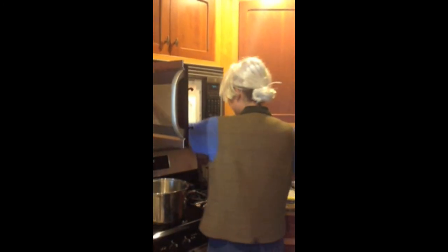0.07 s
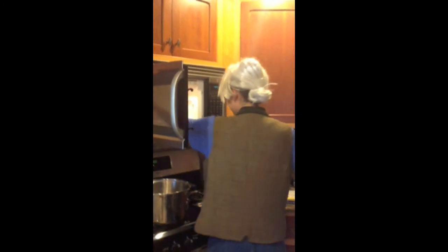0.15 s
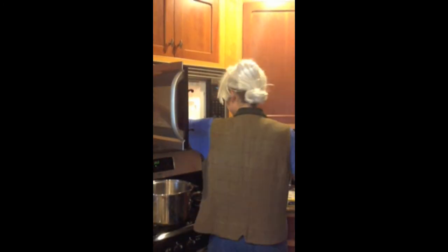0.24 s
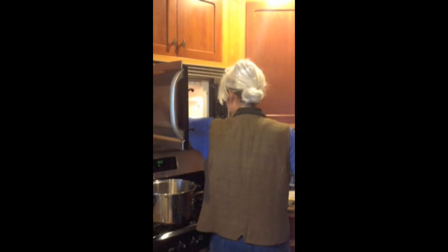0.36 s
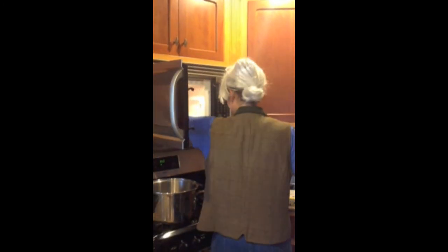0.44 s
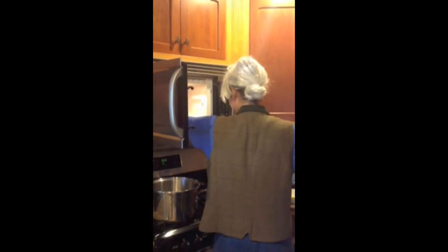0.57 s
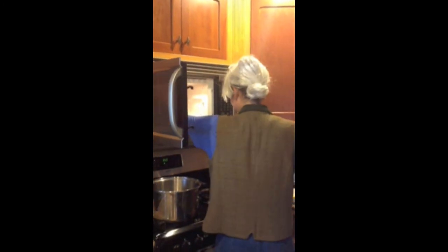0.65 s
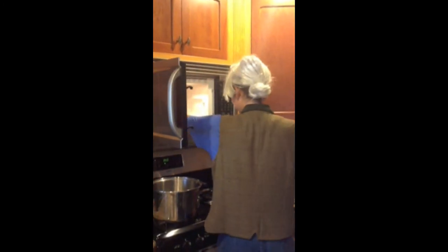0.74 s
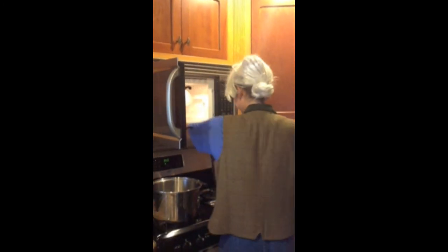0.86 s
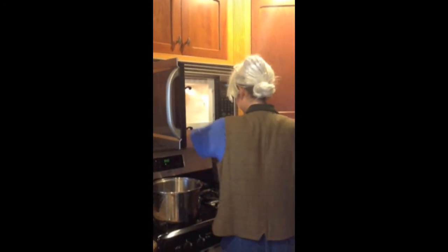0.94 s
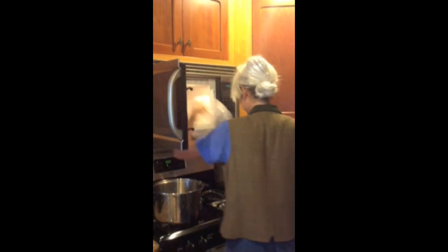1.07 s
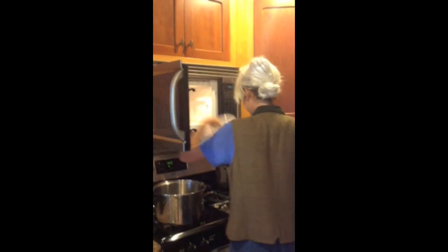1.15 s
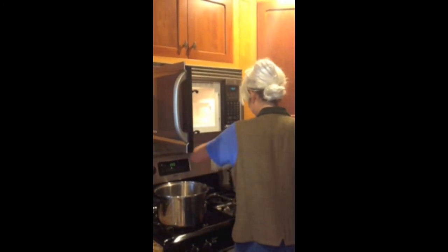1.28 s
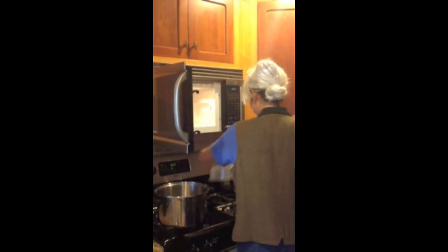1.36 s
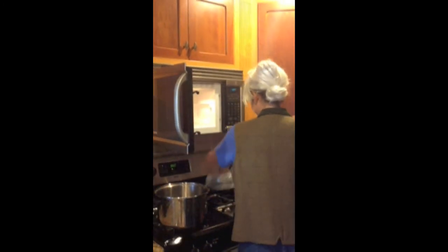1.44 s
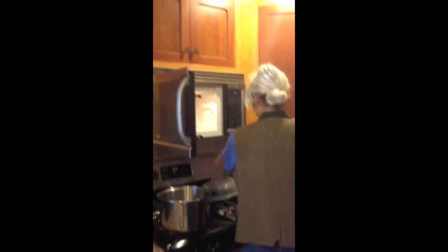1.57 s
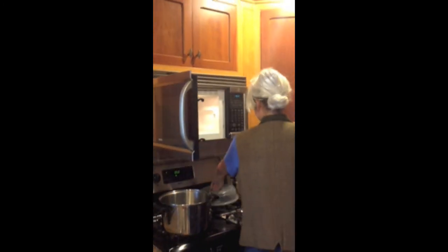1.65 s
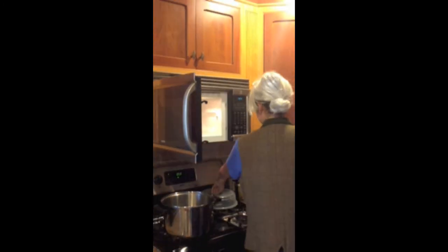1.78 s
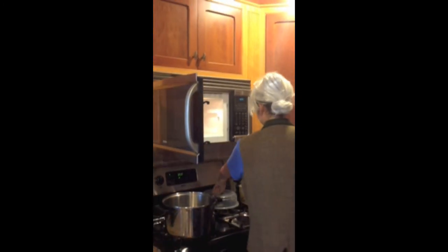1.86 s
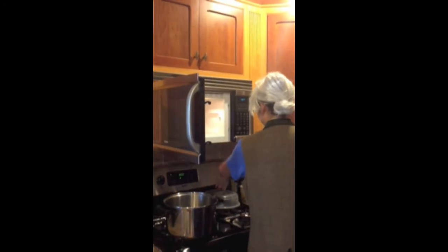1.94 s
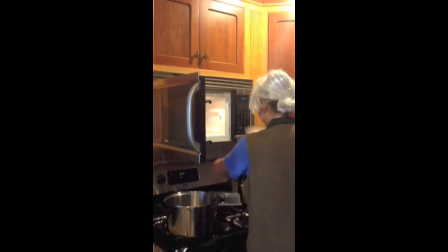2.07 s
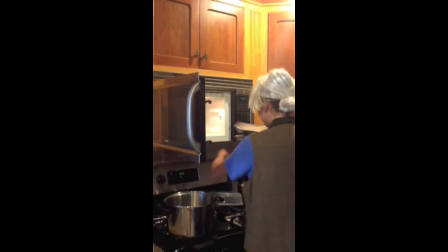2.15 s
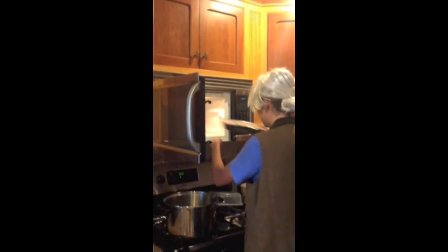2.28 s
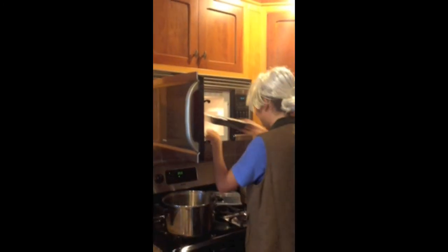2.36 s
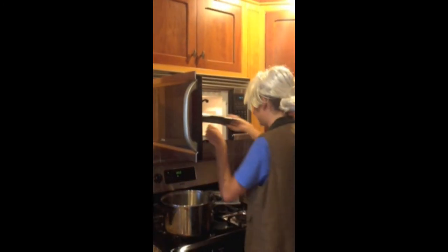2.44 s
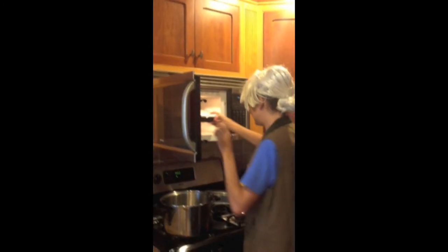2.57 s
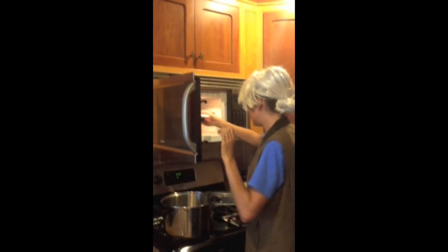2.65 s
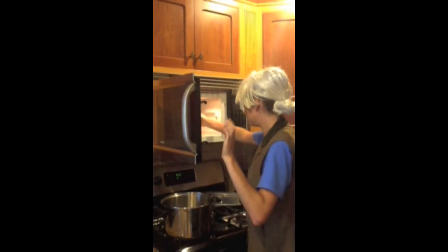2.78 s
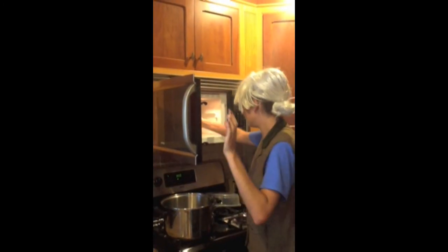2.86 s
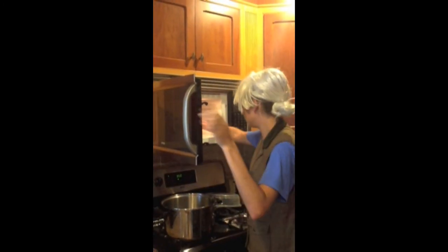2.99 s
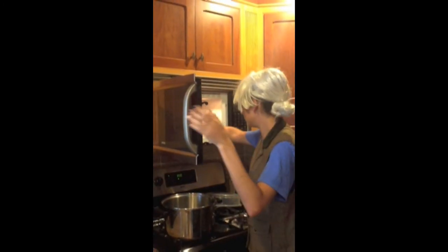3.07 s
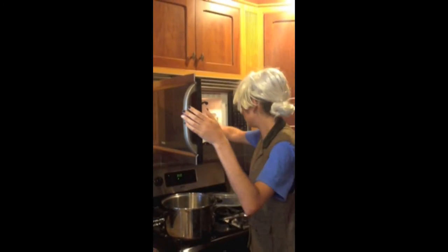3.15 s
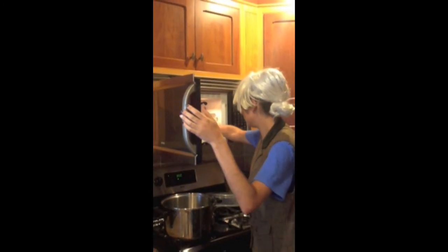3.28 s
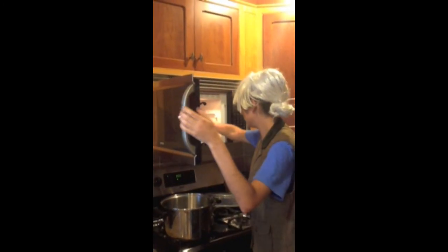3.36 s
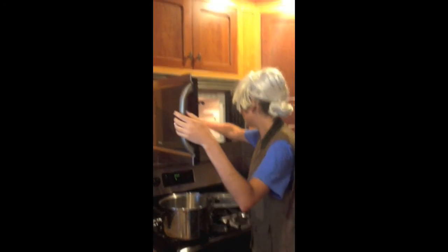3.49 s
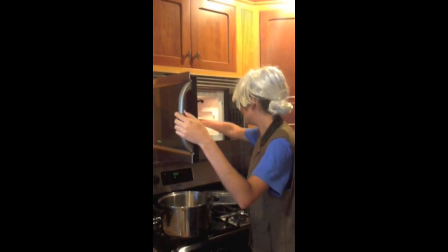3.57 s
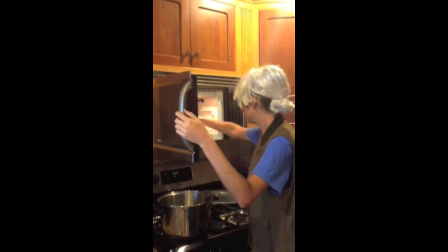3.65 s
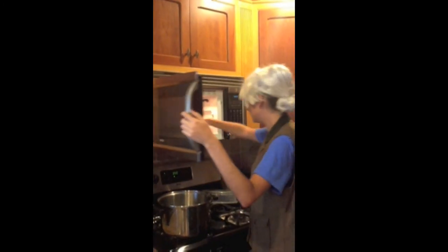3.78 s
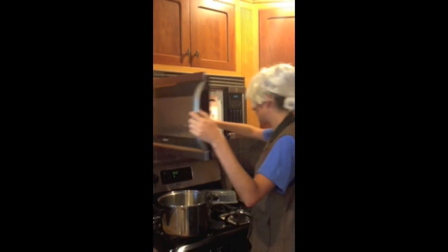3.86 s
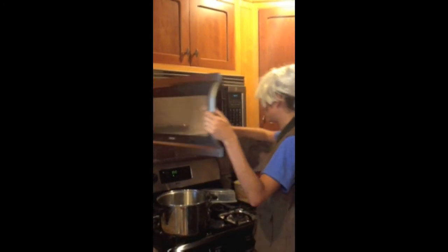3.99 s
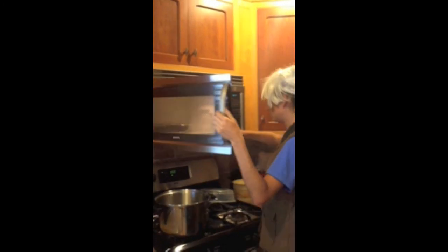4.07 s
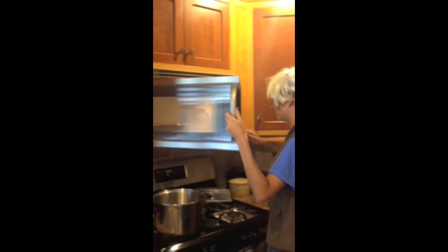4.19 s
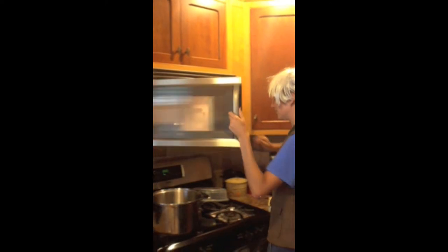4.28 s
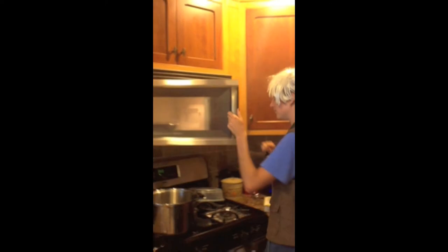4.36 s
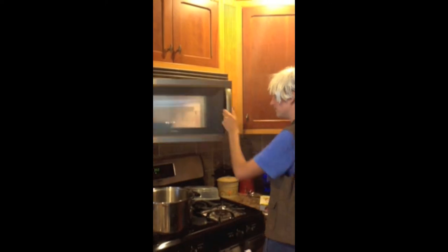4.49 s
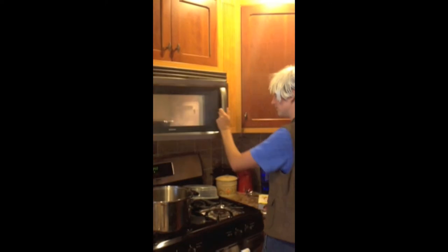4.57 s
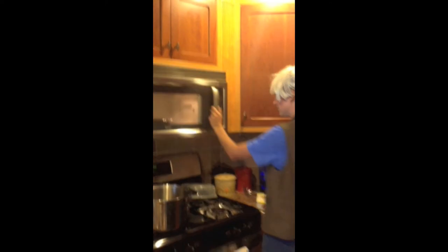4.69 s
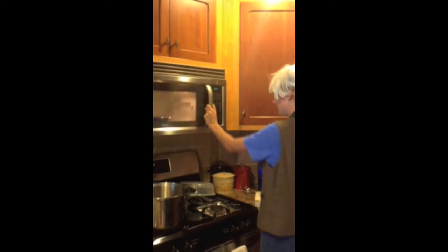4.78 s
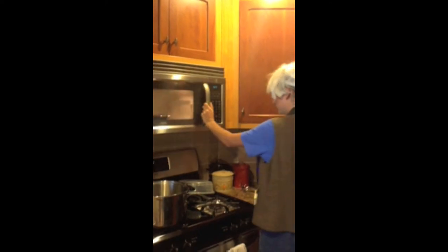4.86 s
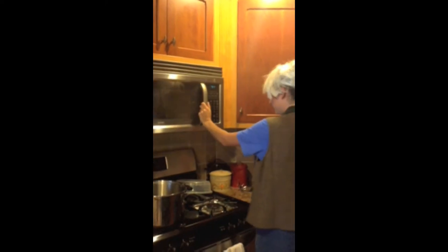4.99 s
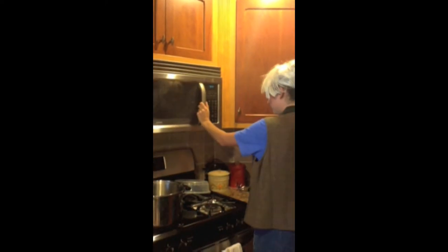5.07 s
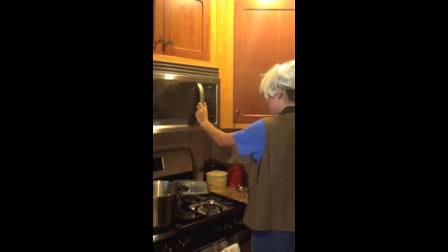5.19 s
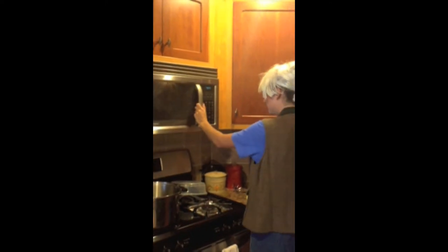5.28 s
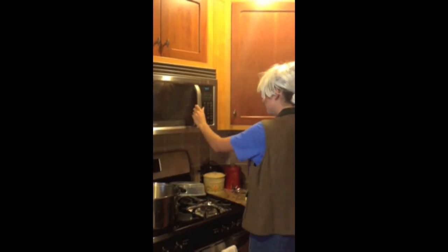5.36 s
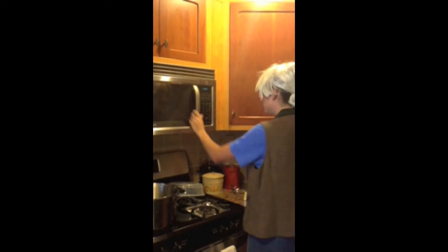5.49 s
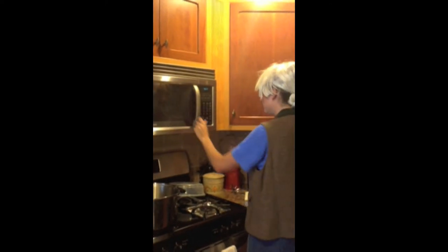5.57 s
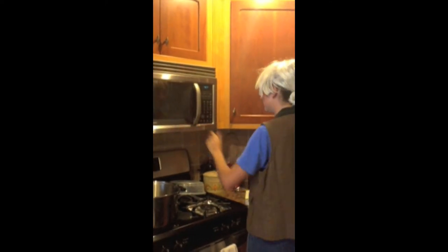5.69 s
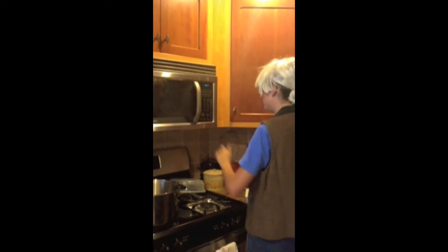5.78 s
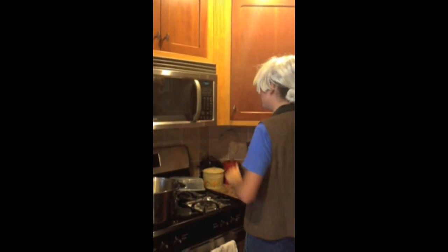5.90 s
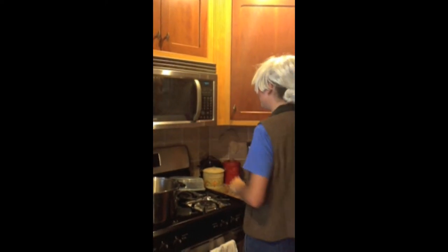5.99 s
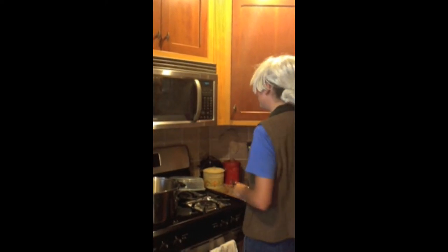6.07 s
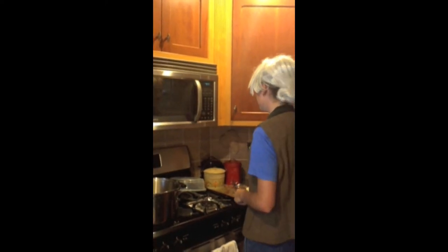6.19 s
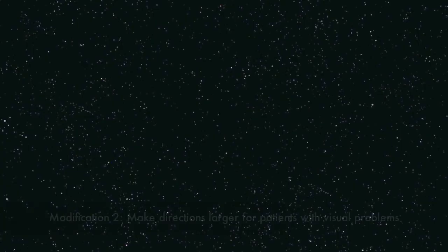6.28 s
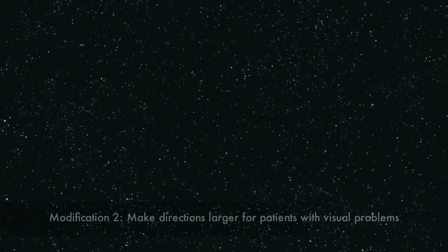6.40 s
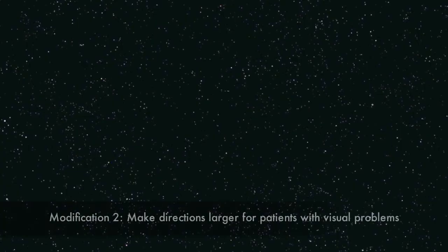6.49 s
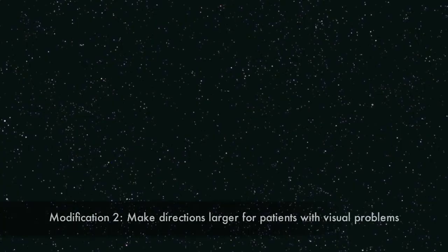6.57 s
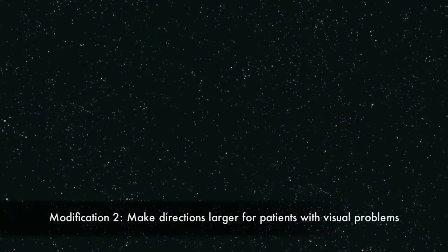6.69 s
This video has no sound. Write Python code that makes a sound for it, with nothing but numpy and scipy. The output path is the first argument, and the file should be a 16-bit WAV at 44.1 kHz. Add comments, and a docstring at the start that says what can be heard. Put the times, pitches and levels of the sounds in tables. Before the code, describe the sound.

In a small kitchen, a glass turntable clunks and wobbles, a cover is set down, a boxed meal slides in, and the microwave door thumps shut.

```python
"""A small kitchen, a few steps from a microwave, over still air and a faint hum. The oven's walls knock, glass squeaks,
and a cover is lifted off the glass turntable, which wobbles; the cover is put down by the stove. A boxed meal is
picked up with cardboard scuffs, lands in the oven and is slid into place with a hiss. The door touches its latch,
then thumps shut and the cabinet booms; the sound fades out. Blows are clicks and room noise through each thing's
colour, with decaying sines that ring on; squeaks and boom are short tones, and the slide and the air coloured noise."""
import sys
import numpy as np
from scipy import signal
from scipy.fft import rfft, irfft
from scipy.io import wavfile
from scipy.ndimage import uniform_filter1d

SR = 44100
rng = np.random.default_rng(int(sys.argv[2]) if len(sys.argv) > 2 else 0)


def generate_wav(signal):
    """Clip the signal to [-1, 1] and save it as 16-bit WAV at the path in sys.argv[1]."""
    frames = np.transpose(np.atleast_2d(signal))
    scaled = np.clip(frames, -1, 1) * 32767
    pcm = np.round(scaled).astype(np.int16)
    wavfile.write(sys.argv[1], SR, pcm)


N = 297219
TIME = np.arange(N) / SR
SIZE = 32768  # samples in each blow's response, about 0.74 s

# Broad colour of the cardboard box. Each row: frequency in Hz, relative level in dB.
BOX_COLOUR = [(100, -18), (350, -5), (600, -15), (1100, -4), (2000, -3.5), (4500, -5), (8000, -2.5),
              (10500, -11), (15000, -11)]


def amp(db):
    """Decibels to gain."""
    return 10 ** (np.asarray(db) / 20)


def unit(x):
    """Scales to rms 1."""
    return x / np.sqrt(np.mean(abs(x) ** 2) + 1e-20)


def read(points, hz):
    """Reads a table along a log-frequency axis."""
    f, value = np.transpose(points)
    return np.interp(np.log(hz + 1), np.log(f + 1), value)


def add(mix, s, sound):
    """Mixes a sound in at time s, in seconds."""
    part = mix[round(s * SR):][:len(sound)]
    part += sound[:len(part)]


def tint(x, spectrum):
    """Gives a steady sound a spectrum, at rms 1."""
    gain = amp(read(spectrum, np.fft.rfftfreq(N, 1 / SR)))
    return unit(irfft(rfft(x) * gain, N))


def drift(rate_hz):
    """Random wandering of rms 1, made of noise that thins out above rate_hz."""
    lowpass = np.exp(-(np.fft.rfftfreq(N, 1 / SR) / rate_hz) ** 2)
    return unit(irfft(rfft(rng.standard_normal(N)) * lowpass, N))


def causal(gain):
    """The minimum-phase impulse response with these gains, which rings only after the blow."""
    mirrored = np.r_[gain, gain[-2:0:-1]]
    log_gain = np.log(np.maximum(mirrored, 1e-5))
    spectrum = np.exp(np.conj(signal.hilbert(log_gain)))
    return irfft(spectrum[:len(gain)])


def diffuse(even_hz=600):
    """Dense reflections: below even_hz their level is kept even, above it they come at random."""
    noise = even = rng.standard_normal(SIZE)
    for size in (2048, 512, 2048, 512, 1024):  # level the noise out in time and pitch
        z = signal.stft(even, nperseg=size)[2]
        even = signal.istft(z / (abs(z) + 1e-12), nperseg=size)[1]
    low = np.fft.rfftfreq(SIZE, 1 / SR) < even_hz
    return irfft(np.where(low, rfft(unit(even[:SIZE])), rfft(noise)))


def kitchen_response(build_s, direct, early_db, early_s, decay, bloom_cycles=0.39, click_s=.0007):
    """A contact as the room returns it: direct click, strong first reflections, a tail whose bass blooms late."""
    # Decay of the room. Each row: frequency in Hz, t60 in seconds before each thing's decay factor.
    room_decay = [(100, .62), (250, .66), (600, .53), (1500, .53), (4000, .48), (8000, .45), (11000, .38),
                  (15000, .37)]
    t, hz = np.arange(SIZE) / SR, np.fft.rfftfreq(SIZE, 1 / SR)
    field, out = rfft(diffuse()), np.zeros(SIZE)
    centres = [f for f, _ in room_decay]
    for (f, t60), pick in zip(room_decay, np.eye(len(room_decay))):
        band = irfft(field * read(np.c_[centres, pick], hz))
        bloom = 1 - np.exp(-t / (build_s + bloom_cycles / f))
        out += band * bloom * np.exp(-np.log(1000) * t / (t60 * decay))
    out *= 1 + amp(early_db) * np.exp(-t / early_s)
    out[0] += direct * np.exp(-build_s / click_s)  # only a sudden contact clicks
    return out


def strike(blows, colour, modes, ring_db, bass_hz, treble_hz, ripple_db, chatter_db, order=2, **room):
    """Blows on one thing: its colour and resonances, with each blow's own bass and treble, heard in the room."""
    hz, out = np.fft.rfftfreq(SIZE, 1 / SR), np.zeros(N)
    power = amp(read(colour, hz)) ** 2
    for f, width, db in modes:
        power = power + amp(db + ring_db) ** 2 / (1 + ((hz - f) / width) ** 2) ** 2
    # countless small, damped upper modes ripple the colour, the same for every blow
    ripple = uniform_filter1d(rng.standard_normal(len(hz)), size=40)
    ripple = unit(uniform_filter1d(ripple, size=30))
    gain = np.sqrt(power) * amp(ripple_db * ripple * hz / (hz + 900))
    low = 1 / (1 + (hz / bass_hz) ** 2)
    high = 1 - 1 / (1 + (hz / treble_hz) ** order)
    for s, db, bass_db, treble_db, build_s in blows:
        body = causal(unit(gain * amp(bass_db * low + treble_db * high)))
        flicker = unit(uniform_filter1d(rng.standard_normal(SIZE), size=130))
        chatter = unit(amp(chatter_db * flicker))  # loose parts rattle
        contact = chatter * kitchen_response(build_s, **room)
        add(out, s, amp(db) * signal.fftconvolve(contact, body)[:SIZE])
    return out


def rings(blows, modes, rise_s=0.0012, rise_cycles=4.2):
    """Every blow feeds energy to the thing's lightly damped modes, which ring on after it."""
    t, out = np.arange(SIZE) / SR, np.zeros(N)
    for hz, mode_db, t60 in modes:
        rise = 1 - np.exp(-t / (rise_s + rise_cycles / hz))  # low modes take longer to swell
        swell = rise * np.exp(-np.log(1000) * t / t60)
        energy = np.zeros(N)
        for s, db, *_ in blows:
            add(energy, s, (amp(db + mode_db) * swell) ** 2)
        out += np.sqrt(2 * energy) * np.sin(2 * np.pi * hz * (TIME - blows[0][0]))
    return out


def settle(start_s, gap_s, db, fade_db, bass_db, thin_db, treble_db, dull_db, build_s, count):
    """A dropped thing rocks to rest: evenly spaced, weakening blows whose bass and treble shift step by step."""
    return [(start_s + k * gap_s, db - k * fade_db, bass_db - k * thin_db, treble_db - k * dull_db, build_s)
            for k in range(count)]


def room_tone(air_db=-63.5, hum_trim_db=-1):
    """Still air as coloured noise of slowly drifting level, and a faint appliance hum of wavering sines."""
    # Colour of the air. Each row: frequency in Hz, relative level in dB.
    air_colour = [(15, -72.5), (25, -41), (44, -35), (150, -5.5), (172, -5), (202, 3.5), (264, -4.5),
                  (301, -4), (394, -9), (501, -11.5), (903, -14.5), (1210, -20), (4750, -26.5),
                  (10000, -31.5), (15000, -34.5)]
    # Tones of the hum. Each row: frequency in Hz, level in dB before the trim.
    hum_tones = [(199.2, -80), (393.0, -77), (893.6, -84)]
    air = tint(rng.standard_normal(N), air_colour) * amp(air_db + .5 * drift(1.3))
    hum = sum(amp(db) * np.sqrt(2) * np.sin(2 * np.pi * hz * TIME + 1.3 * drift(8.9)) for hz, db in hum_tones)
    return air + amp(hum_trim_db) * hum


def oven_knocks():
    """Knocks on the oven's walls, whose low modes ring on."""
    # Knocks. Each row: start in seconds, level in dB before the trim, extra bass in dB, extra treble in dB,
    # build-up of the contact in seconds.
    blows = [(.229, -47, -7, 8.5, 0.00061), (.305, -61, -2, 3, 0.0063), (.394, -48, 20, 24, 0.0062),
             (.513, -41.5, -9, -4.5, 0.002), (.524, -40.5, -1.5, -0.5, 0.0038), (3.548, -46, -9, -7, 0.011),
             (3.577, -40, -14, -31, 0.0022), (3.640, -48, 2, 0, 0.0032)]
    # Broad colour of the walls. Each row: frequency in Hz, relative level in dB.
    colour = [(25, -55), (50, -38), (100, -30), (165, 2.5), (240, -5.5), (340, 5), (520, -17.5),
              (700, -20.5), (1200, -23), (2400, -27), (4000, -37.5), (8000, -44), (15000, -68)]
    # Their resonances. Each row: frequency in Hz, width in Hz, level in dB before ring_db is added.
    modes = [(171, 14, 3.5), (335, 90, -3.5), (810, 46, -13), (1187, 37, -14)]
    # Modes that ring on. Each row: frequency in Hz, level in dB against the untrimmed blow, t60 in seconds.
    ringing = [(163, -5.5, 0.27), (374, -4, 0.34)]
    knocks = strike(blows, colour, modes, ring_db=-3.5, direct=57, early_db=-9, early_s=0.012,
                    decay=0.78, bass_hz=250, treble_hz=1490, ripple_db=4.5, chatter_db=1.0)
    return amp(-1.5) * knocks + rings(blows, ringing)


def squeaks(glide=0.11, waver=0.1, upper_ratio=1.3, upper_db=-3):
    """Each stick-slip is a short wavering tone with a second above it, blurred by the room; the glass rings on."""
    # Squeaks on glass. Each row: start in seconds, pitch in Hz, level in dB, length in seconds before the room blurs it.
    slips = [(0.340, 840, -60.5, 0.021), (0.442, 862, -59, 0.061), (0.763, 881, -54.5, 0.026),
             (2.401, 659, -65.5, 0.018)]
    # The glass ringing on. Each row: frequency in Hz, level in dB against the squeak, t60 in seconds.
    ringing = [(1164, -15, 0.99)]
    out = np.zeros(N)
    for s, hz, db, length in slips:
        u = np.linspace(-1, 1, int(length * SR) + 2)
        bend = glide * u * np.exp(-(length / 0.055) ** 2)  # short slips bend most
        pitch = hz * (1 + bend + waver * drift(190)[:len(u)])
        phase = 2 * np.pi * np.cumsum(pitch) / SR
        tone = (1 - u ** 2) * (np.sin(phase) + amp(upper_db) * np.sin(upper_ratio * phase))
        wet = signal.fftconvolve(tone, kitchen_response(0, direct=35, early_db=1, early_s=0.027, decay=0.48))
        add(out, s, amp(db) * np.sqrt(len(u)) * wet / np.linalg.norm(wet))
    return out + rings([(s, db) for s, _, db, _ in slips], ringing)


def turntable():
    """The glass turntable is knocked, then wobbles to rest in evenly spaced, weakening blows."""
    # First knocks. Each row: start in seconds, level in dB before the trim, extra bass in dB, extra treble in dB,
    # build-up of the contact in seconds.
    knocks = [(.9003, -36, -34, 9, .0001), (.912, -29.5, 6.5, 3.5, 0.0011), (.939, -30.5, -2, 5, 0.0011)]
    # Broad colour of the glass. Each row: frequency in Hz, relative level in dB.
    colour = [(29, -79), (50, -51), (118, -7), (177, 2), (292, -1), (494, 3), (674, 4.5), (964, -7.5),
              (1250, -7.5), (1750, -8.5), (1930, -17), (2330, -17), (15000, -39)]
    # Its resonances. Each row: frequency in Hz, width in Hz, level in dB before ring_db is added.
    modes = [(291, 43, 3.5), (680, 37, -24), (1251, 25, -5), (1590, 60, -9.5), (1930, 130, -19),
             (2235, 13, -11.5)]
    # Modes that ring on. Each row: frequency in Hz, level in dB against the untrimmed blow, t60 in seconds.
    ringing = [(125.3, -15, 0.53), (685, -6, 0.36)]
    wobble = settle(start_s=1.0, gap_s=.0395, db=-41.5, fade_db=1.7, bass_db=-8, thin_db=1.0,
                    treble_db=-9.5, dull_db=-0.6, build_s=0.00064, count=7)
    blows = [*knocks, *wobble]
    glass = strike(blows, colour, modes, ring_db=5, direct=8.4, early_db=1.5, early_s=0.014,
                   decay=1.0, bass_hz=266, treble_hz=2500, ripple_db=1.5, chatter_db=1.0)
    return amp(-3.5) * glass + rings(blows, ringing)


def cover_put_down():
    """The cover meets the surface by the stove in several contacts, some sudden and some soft."""
    # Contacts. Each row: start in seconds, level in dB before the trim, extra bass in dB, extra treble in dB,
    # build-up in seconds.
    blows = [(1.724, -54, -13, 16.5, 0.006), (1.778, -39, 15.5, 13.5, 0.00057),
             (1.787, -37.5, -1.5, 14, 0.004), (1.9125, -36.5, -11.5, -4.5, .0005),
             (2.060, -46.5, -1, 6, 0.027), (2.103, -40.5, -35, -3.5, 0.011), (2.143, -42.5, 18, 18, 0.017)]
    # Broad colour of the cover. Each row: frequency in Hz, relative level in dB.
    colour = [(25, -60), (50, -42), (100, -22.5), (180, -2), (290, -4), (430, 1), (560, -9), (950, -6.5),
              (1500, -9), (2400, -17.5), (3200, -22), (4500, -31.5), (8000, -36.5), (11000, -46.5),
              (15000, -50)]
    # Its resonances. Each row: frequency in Hz, width in Hz, level in dB before ring_db is added.
    modes = [(406, 64, 3.5), (635, 28, -6), (1015, 18, 1), (1600, 240, -30), (2080, 22, -18)]
    # Modes that ring on. Each row: frequency in Hz, level in dB against the untrimmed blow, t60 in seconds.
    ringing = [(295, -1.5, 0.21), (440, -9.5, 0.41)]
    cover = strike(blows, colour, modes, ring_db=-5, direct=21, early_db=-2.5, early_s=0.032,
                   decay=0.94, bass_hz=266, treble_hz=3620, ripple_db=2.5, chatter_db=1.0, order=4)
    return amp(-1.0) * cover + rings(blows, ringing)


def box_scuffs(bass_db=-16, thinning=.8):
    """Fingers and corners catch on the cardboard; the brighter a scuff, the less body it has."""
    # Scuffs. Each row: start in seconds, level in dB before the trim, brightness in dB,
    # build-up of the contact in seconds.
    scuffs = [(1.372, -64.5, -7, 0.00064), (1.452, -63, -10, 0.00034), (2.560, -59.5, -5, 0.0026),
              (2.632, -58, -5, .0005), (2.716, -57, -14.5, 0.0034), (2.889, -48.5, 1.5, 0.0082),
              (3.196, -43, -2, 0.007), (3.425, -46.5, 1, 0.00095), (3.607, -50, 8, .0001),
              (3.670, -56, 11, .0032), (3.794, -58, 4, .0005), (4.138, -65, -5, .0003),
              (4.477, -64, -18, 0.00066)]
    blows = [(s, db, bass_db - thinning * bright_db, bright_db, build_s) for s, db, bright_db, build_s in scuffs]
    box = strike(blows, BOX_COLOUR, [], ring_db=0, direct=10, early_db=-0.5, early_s=0.0085,
                 decay=0.98, bass_hz=700, treble_hz=3500, ripple_db=3.5, chatter_db=0.2)
    return amp(-2.5) * box


def meal_landing():
    """The boxed meal lands in the oven, then rocks to rest in blows that weaken, thin and dull."""
    # Landing. Each row: start in seconds, level in dB before the trim, extra bass in dB, extra treble in dB,
    # build-up of the contact in seconds.
    landing = [(3.026, -44, 8.5, 11, 0.00067), (3.038, -26.5, 14, -2.5, 0.00054),
               (3.053, -26.5, -14, 1.5, 0.0041)]
    # Broad colour of the meal. Each row: frequency in Hz, relative level in dB.
    colour = [(29, -70), (50, -58), (102, -34), (161, -1.5), (266, -6.5), (314, -4), (439, -6), (570, -15),
              (707, -14.5), (1410, -24), (2820, -17), (3260, -12.5), (4660, -23.5), (8070, -28.5),
              (15000, -45.5)]
    # Its resonances. Each row: frequency in Hz, width in Hz, level in dB before ring_db is added.
    modes = [(306, 65, -6.5), (567, 23, -7), (3210, 160, -9.5), (3910, 380, -9.5)]
    # Modes that ring on. Each row: frequency in Hz, level in dB against the untrimmed blow, t60 in seconds.
    ringing = [(162.7, -9.5, 0.53), (320.7, -1, 0.14), (555, -11, 0.32)]
    rocking = settle(start_s=3.089, gap_s=.0305, db=-30.5, fade_db=5, bass_db=8, thin_db=7.0,
                     treble_db=0.5, dull_db=1.3, build_s=0.002, count=3)
    blows = [*landing, *rocking]
    meal = strike(blows, colour, modes, ring_db=-5.5, direct=8, early_db=-1.5, early_s=0.03,
                  decay=0.9, bass_hz=300, treble_hz=1810, ripple_db=3.5, chatter_db=1.5)
    return amp(-2.0) * meal + rings(blows, ringing)


def push(start_s, length_s, db, attack_s=0.031, sag_db_per_s=30, release_db_per_s=160):
    """The box gets going quickly, slows a little and dies away when the hand stops."""
    t = np.maximum(TIME - start_s, 0)
    fall_db = sag_db_per_s * np.minimum(t, length_s) + release_db_per_s * np.maximum(t - length_s, 0)
    return np.minimum(t / attack_s, 1) * amp(db - fall_db)


def slide(trim_db=-1, grain_db=0.8, grains_per_s=6000, ripple_db=2.5, sing_hz=710, sing_db=-10.5, stutter_db=4):
    """Cardboard catches and slips in grains so fine that they merge to a hiss; the glass sings under the last push."""
    # Pushes of the box over the glass. Each row: start in seconds, length in seconds before the release,
    # level in dB before the trim.
    pushes = [(3.327, 0.085, -47), (3.786, 0.042, -53.5), (3.842, 0.12, -43)]
    speed = sum(push(*row) for row in pushes)
    grain_gain = amp(grain_db * np.minimum(rng.exponential(1, N), 4))
    slips = rng.standard_normal(N) * grain_gain * (rng.random(N) < grains_per_s / SR)
    hz = np.geomspace(100, 16000, 300)
    colour = np.c_[hz, read(BOX_COLOUR, hz) + ripple_db * rng.standard_normal(len(hz))]  # many small modes
    hiss = tint(unit(slips) + rng.standard_normal(N), colour)
    tone = np.sin(2 * np.pi * sing_hz * TIME + 0.71 * drift(34))
    sing = amp(sing_db + stutter_db * drift(33)) * push(*pushes[-1]) * tone
    return speed * amp(trim_db) * hiss + sing


def cabinet_boom(peak_s=5.019, hz=182, length_s=0.014, db=-20):
    """The door's push swells in the cabinet's lowest mode and drains away."""
    swell = np.exp(-((TIME - peak_s) / length_s) ** 2)
    return amp(db) * np.sqrt(2) * swell * np.sin(2 * np.pi * hz * (TIME - peak_s))


def door_closing():
    """The door touches its latch, then thumps shut; latch and door each ring on in their own modes."""
    # Touches of the latch, then the thump. Each row: start in seconds, level in dB before the trim,
    # extra bass in dB, extra treble in dB, build-up of the contact in seconds.
    latch_blows = [(4.8555, -34, -3, 12.5, .0015), (4.917, -42.5, -11.5, 9.6, .001)]
    door_blows = [(4.946, -24.5, -8.5, 11.5, 0.00083), (4.955, -17.5, -6.5, 0, .0013),
                  (4.976, -25.5, -4, -2, .0008)]
    # Broad colour of the door. Each row: frequency in Hz, relative level in dB.
    colour = [(24, -62.5), (40, -44.5), (95, -12.5), (138, -9.5), (215, -9), (298, -1.5), (373, -0.5),
              (454, -7.5), (643, -5.5), (746, -12.5), (804, -7), (1250, -13), (1730, -12), (1870, -15.5),
              (2220, -14.5), (2580, -19), (4790, -21.5), (15000, -39.5)]
    # Its resonances. Each row: frequency in Hz, width in Hz, level in dB before ring_db is added.
    modes = [(184, 30, 3), (371, 12, -1.5), (525, 54, -3.5), (646, 20, -13), (1026, 25, -17.5),
             (1650, 22, -12.5), (2030, 43, -20), (3140, 200, -18.5), (3370, 31, -17), (4150, 120, -25.5),
             (4770, 28, -27.5), (4910, 52, -21)]
    # Modes that ring on. Each row: frequency in Hz, level in dB against the untrimmed blow, t60 in seconds.
    latch_ringing = [(516, -4, 0.14), (1600, -8, .07), (3320, -11.5, .18), (3820, 6, .05)]
    door_ringing = [(164.9, -8, 0.38), (248, -18, 0.82), (364, -9.5, .35), (664, -4, 0.18),
                    (770, -19.5, 0.52), (1095, -18, 0.16), (1434, -22.5, 0.45), (1769, -20.5, 0.4),
                    (1860, -50, 2)]
    door = strike([*latch_blows, *door_blows], colour, modes, ring_db=2.0, direct=5, early_db=-1.5, early_s=0.034,
                  decay=0.97, bass_hz=303.2, treble_hz=2500, ripple_db=1.25, chatter_db=1.72)
    return amp(-2.5) * door + rings(latch_blows, latch_ringing) + rings(door_blows, door_ringing)


def scene():
    """The room, all the handling and the door."""
    handling = oven_knocks() + squeaks() + turntable() + cover_put_down() + box_scuffs() + meal_landing() + slide()
    return (room_tone() + handling + cabinet_boom() + door_closing())[None]


def record(dry, low_cut_hz=48, edge_hz=15500):
    """A small microphone without deep bass, the closing fade and the band limit."""
    # Overall gain and closing fade. Each row: time in seconds, linear gain.
    fade = [(6.22, 0.91), (6.32, 0.0077)]
    thin = signal.sosfilt(signal.butter(2, low_cut_hz, "high", fs=SR, output="sos"), dry)
    faded = thin * np.interp(TIME, *np.transpose(fade))
    band_limit = signal.firwin(511, edge_hz, window=("kaiser", 9), fs=SR)
    return signal.oaconvolve(faded, band_limit[None], "same")


dry = scene()
out = record(dry)
generate_wav(out)
```